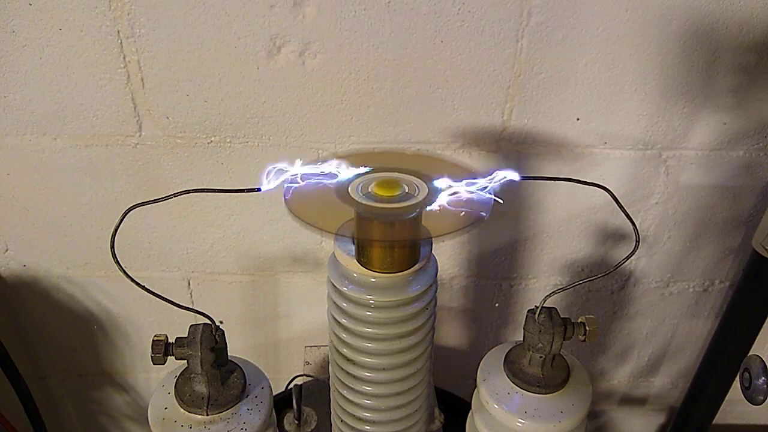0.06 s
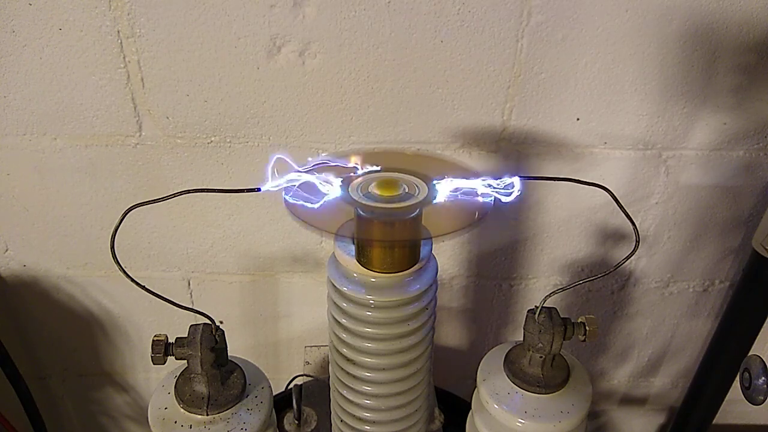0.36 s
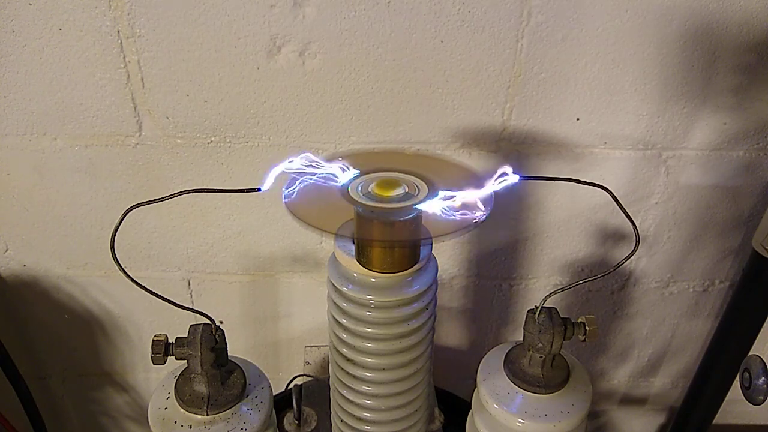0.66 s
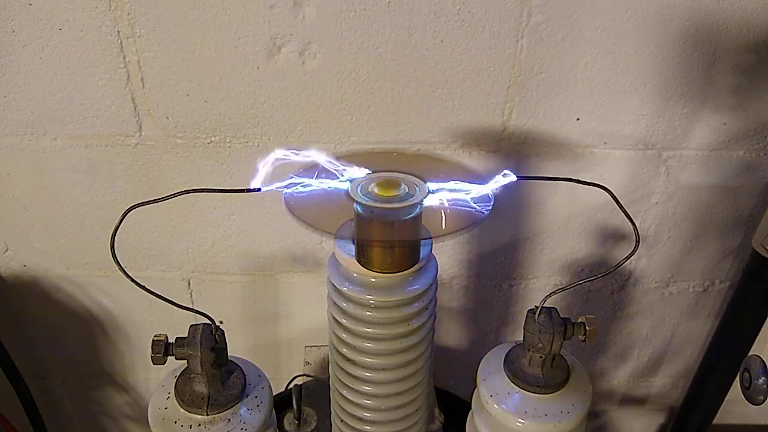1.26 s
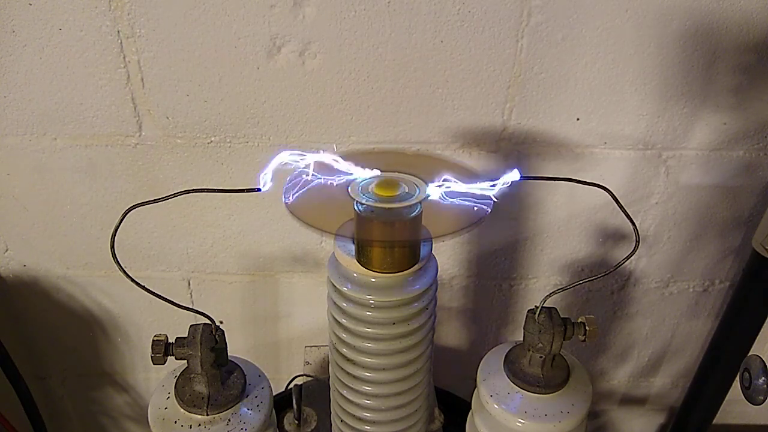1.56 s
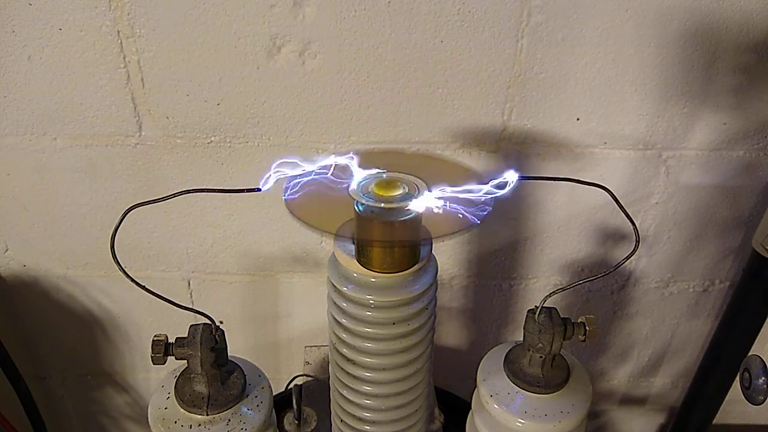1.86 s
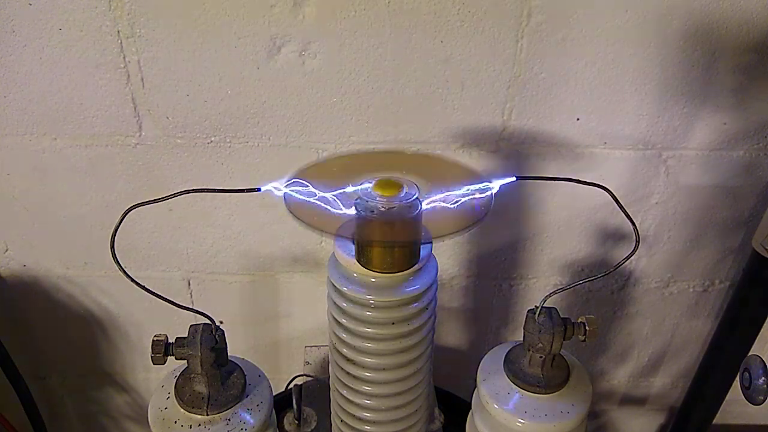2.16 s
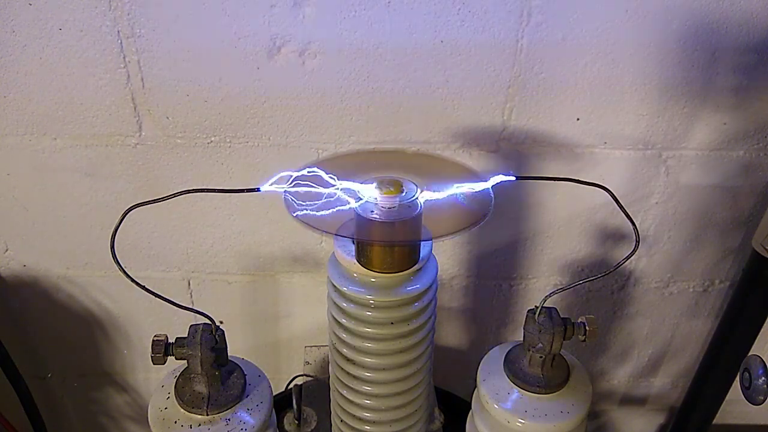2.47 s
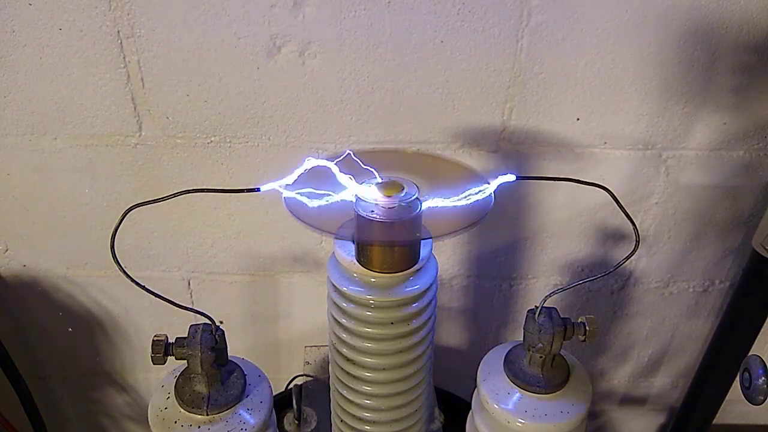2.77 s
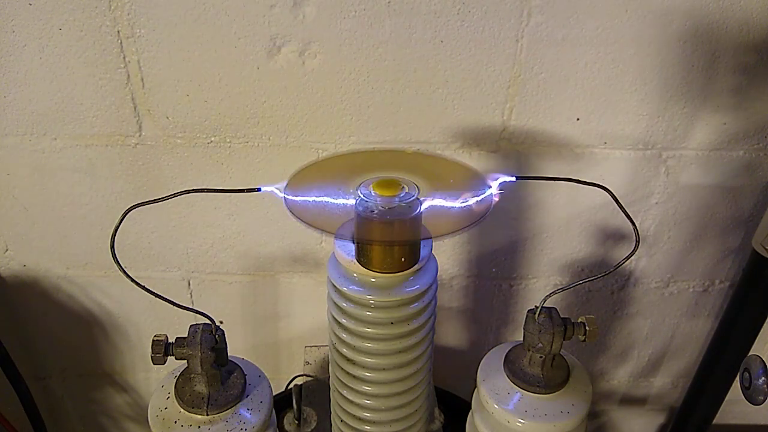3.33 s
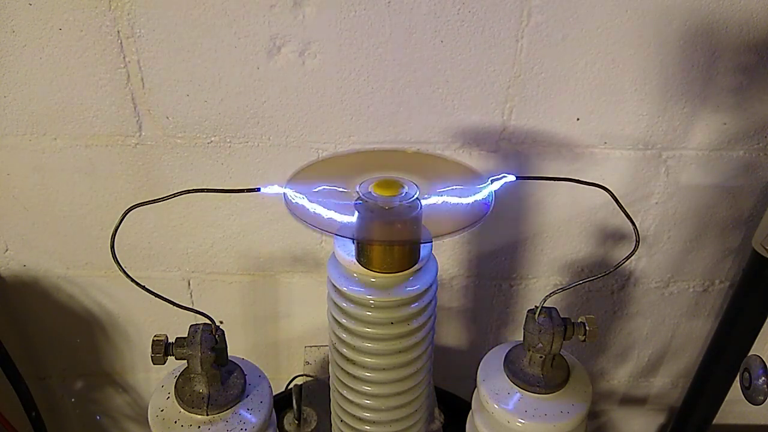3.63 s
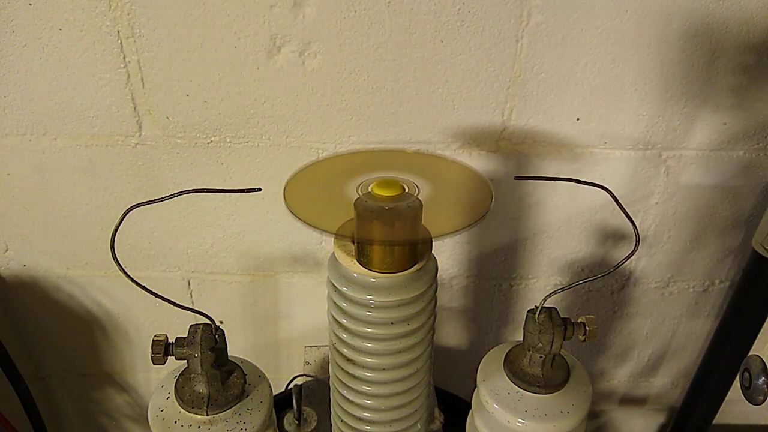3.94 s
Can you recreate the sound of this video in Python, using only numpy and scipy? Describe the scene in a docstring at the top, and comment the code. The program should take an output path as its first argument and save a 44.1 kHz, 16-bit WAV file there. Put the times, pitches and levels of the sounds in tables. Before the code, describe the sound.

High-voltage electric arcs buzz and crackle loudly from two electrodes onto a disc, with irregular sharp snaps. Past halfway the buzz turns coarser and stutters, then stops abruptly. The sound is close and wide in a small echoing room.

```python
"""High-voltage arcs, fed by mains power, jump from two electrodes onto a disc in a small masonry room.
At first both gaps spark a few times in every half cycle of the mains. Then the arc flashes right across,
in longer volleys once a cycle, changing polarity at random until the power is cut.
Each spark cracks, sizzles and thumps the air. The room echoes, and the stereo sound is widened."""
import sys
import numpy as np
from scipy import signal
from scipy.fft import rfft, irfft
from scipy.io import wavfile
from scipy.ndimage import uniform_filter1d, map_coordinates

SR = 44100
rng = np.random.default_rng(int(sys.argv[2]) if len(sys.argv) > 2 else 0)


def generate_wav(sig):
    """Save sig (samples, or channels by samples) to the path in sys.argv[1] as 16-bit PCM at SR."""
    pcm = np.round(np.clip(np.atleast_2d(sig).T, -1, 1) * 32767).astype(np.int16)
    wavfile.write(sys.argv[1], SR, pcm)


N = 176400
MAINS_HZ, FIRST_SPARK_S, FLASHOVER_S = 60.035, .0046, 2.166


def sparks():
    """The air breaks down in step with the mains: every half cycle at first, later once a cycle."""
    # sparks in a short and a long volley: delay_ms, level_db, chance (0 to 1)
    short_volley = [(0.298, 0, 1), (0.902, -5, .7), (2.098, -1, .9), (4.4, -1.5, .45)]
    long_volley = [(.25, 1, 1), (1.3, -0.5, .95), (2.1, -1, 0.93), (3.3, -1, .9), (4.8, -0.5, .85),
                   (7.3, -2.5, .45)]
    # the arc falters: start_s, end_s, level_db
    lulls = [(.365, 0.376, -5.5), (.527, .537, -7), (.577, 0.595, -10), (.64, 0.659, -6.5),
             (.712, 0.745, -2), (.93, 0.937, -8), (1.0, 1.047, -4.5), (1.36, 1.369, -6.5),
             (1.474, 1.499, -3.5), (1.915, 1.966, -3)]
    # the arc flashes right across: start_s, end_s, level_db
    runs = [(2.170, 2.337, 0.5), (2.328, 2.411, 1), (2.437, 2.488, 1.5), (2.511, 2.511, 1.5),
            (2.520, 2.520, 1.5), (2.545, 2.728, -1.5), (2.553, 2.586, -6), (2.736, 2.903, -0.5),
            (2.911, 2.978, -3.5), (2.936, 2.936, -1.5), (2.970, 3.069, -2.5), (3.028, 3.028, 0),
            (3.078, 3.228, 1), (3.253, 3.336, 1), (3.344, 3.428, -3), (3.453, 3.5855, -1),
            (3.494, 3.494, 2), (3.611, 3.661, -.5), (3.686, 3.752, 0)]
    half_cycle_s = .5 / MAINS_HZ
    early_s = np.arange(FIRST_SPARK_S, FLASHOVER_S, half_cycle_s)
    early_db = sum(db * ((early_s >= start) & (early_s <= end)) for start, end, db in lulls)
    nearest = lambda s: int(round((s - FIRST_SPARK_S) / half_cycle_s))
    late_s, late_db = np.array([(FIRST_SPARK_S + k * half_cycle_s, db) for start, end, db in runs
                                for k in range(nearest(start), nearest(end) + 1, 2)]).T
    return np.hstack([volleys(early_s, early_db, short_volley, thump_db=0),
                      volleys(late_s, late_db - .5, long_volley, thump_db=-3.5)])


def volleys(starts, db, pattern, thump_db):
    """A few sparks follow each breakdown. Returns three rows: time_s, crack_db, thump_db."""
    delay_ms, spark_db, chance = np.array(pattern).T
    shape = (len(starts), len(delay_ms))
    fires = rng.random(shape) < chance
    jitter_ms = (.12 + .1 * delay_ms) * rng.standard_normal(shape)  # later sparks stray more
    times = starts[:, None] + (delay_ms + jitter_ms) / 1000
    strength_db = (db[:, None] + spark_db)[fires]
    return np.array([times[fires], strength_db, strength_db + thump_db])


def gap(times, crack_db, thump_db, side):
    """One gap's crooked sparks, each a little different. Returns crack plus sizzle, and thump."""
    # how the strength drifts: time_s, thump_db, crack_db
    drift = [(0.0, -34.5, -25), (0.1, -34, -24.5), (0.2, -31, -23.5), (0.55, -34.5, -24),
             (0.72, -33.5, -23.5), (0.79, -31.5, -22.5), (0.9, -30, -23), (1.06, -32.5, -23),
             (1.26, -29.5, -24.5), (1.31, -36.5, -23.5), (1.54, -33.5, -24.5), (1.82, -33.5, -24.5),
             (2.12, -36.5, -25), (2.19, -39, -24), (2.31, -31, -22.5), (2.38, -37, -22.5),
             (2.65, -34, -23.5), (3.01, -31, -21.5), (3.12, -41, -24.5), (3.33, -31, -22),
             (3.53, -33.5, -23), (3.75, -32, -26)]
    # lone hard breakdowns, taking the two gaps by turns: time_s, crack_db, thump_db
    snaps = [(0.1054, -10.5, -13), (.189, -23, -21), (0.1982, -10.5, -25), (0.305, -13, -36),
             (0.3133, -15, -12), (0.3546, -19, -16.5), (0.4223, -15, -28), (0.4552, -20, -15.5),
             (0.481, -13.5, -40), (0.5059, -21, -20), (.55, -13.5, -15), (0.5711, -14.5, -39),
             (0.5991, -18.5, -13), (.606, -29, -9), (0.6298, -13, -14), (0.6806, -16, -18.5),
             (0.7656, -18, -21), (.796, -11, -15), (0.8225, -15.5, -21.5), (0.8642, -28, -27),
             (0.9053, -13, -29), (0.972, -28, -13), (1.097, -18, -33), (1.147, -20, -19),
             (1.1715, -13, -12.5), (1.228, -26, -17), (1.246, -19, -12), (1.496, -22, -9.5),
             (1.504, -21, -14), (1.55, -14.5, -28), (1.6656, -24, -17), (1.6916, -13.5, -33),
             (1.8371, -14.5, -17), (1.8469, -20, -11), (1.8705, -16, -15.5), (1.9053, -20.5, -15),
             (1.9624, -15, -22), (1.9891, -22, -28), (2.095, -11, -9), (2.122, -16, -22),
             (2.1388, -11, -44), (2.238, -17, -23), (2.3207, -11, -20), (2.3966, -14, -31),
             (2.5209, -6.5, -18), (2.545, -7, -26), (2.696, -18, -29), (2.7754, -13, -27.5),
             (2.871, -16, -14), (2.9631, -15, -23.5), (3.1825, -16, -19.5), (3.2773, -15, -29),
             (3.5549, -16, -25), (3.72, -19.5, -21), (3.7533, -13, -23.5), (3.7602, -23, -31.5)]
    drift_s, bass_db, treble_db = np.array(drift).T
    snap_s, snap_db, pop_db = np.array(snaps[side::2]).T
    path, sharpness, heat, lag, push = rng.standard_normal((len(times), 5)).T
    times = times + .00016 * path
    crack_db = crack_db + np.interp(times, drift_s, treble_db) + 2 * sharpness
    thump_db = thump_db + np.interp(times, drift_s, bass_db) + 4.5 * heat
    power = clicks(times, undb(crack_db) ** 2) + clicks(snap_s, undb(snap_db) ** 2)
    direction = np.sign(push + .45)  # more thumps push than pull
    pushes = clicks(times + .00057 * lag, direction * undb(thump_db)) + clicks(snap_s, undb(pop_db))
    return crack(power) + sizzle(power), thump(pushes)


def crack(power):
    """Each spark gives a very short, ragged crack."""
    # tone of a crack: pitch_hz, level_db
    tone = [(60, -21.5), (250, 0.5), (600, 2), (1200, -1.5), (2100, -4.5), (2900, -3.5), (3800, -4.5),
            (5200, -11.5), (6500, -15), (8000, -19.5), (11000, -14.5), (15000, -16.5)]
    return level(colour(bursts(power, fade_ms=.35), tone), -23.5)


def thump(pushes):
    """Air heated by a spark gives a low thump."""
    # tone of a thump before and after the arc flashes across: pitch_hz, level_db
    short_tone = [(25, -38.5), (45, -12), (65, -2.5), (95, -4), (150, -1.5), (250, -5.5), (500, -14.5),
                  (1000, -24.5), (2500, -47), (8000, -69)]
    long_tone = [(25, -20), (45, -13), (65, -8), (95, -3.5), (150, -1), (250, -4), (500, -15.5),
                 (1000, -26.5), (2500, -32), (8000, -57)]
    across = np.arange(N) / SR > FLASHOVER_S
    return level(colour(pushes * ~across, short_tone) + colour(pushes * across, long_tone), -21)


def sizzle(power):
    """Each spark sizzles briefly over the disc."""
    # tone of the sizzle: pitch_hz, level_db
    tone = [(1000, -7), (3000, 4.5), (6000, -9), (8000, -5), (11000, 1.5), (15000, 6.5)]
    return level(colour(bursts(power, fade_ms=2.3), tone), -40)


def in_room(cracks, thumps):
    """The direct sound, quick echoes off the near wall, longer room echoes and background noise."""
    # tone of the cracks' echoes, and extra shaping for the late ones: pitch_hz, level_db
    wall_tone = [(100, -10.5), (500, -18), (1200, -13.5), (2200, 3), (3100, -2.5), (5000, 1.5), (8000, 5),
                 (11000, 5), (15000, -0.5)]
    late_tone = [(150, 1), (400, -4.5), (600, 9), (800, -8), (1500, -1), (3000, 3.5), (7000, -3),
                 (15000, -7.5)]
    bright = colour(cracks, wall_tone)
    early = undb(-4.5) * wandering_echoes(bright, fade_s=.13, paths=5)
    late = echoes(undb(-15.5) * colour(bright, late_tone) + undb(-29.5) * thumps, fade_s=.74)
    return cracks + thumps + early + late + ring(cracks) + background()


def wandering_echoes(x, fade_s, paths):
    """Each volley takes one of a few paths over the disc, and each path has its own echoes."""
    volley = (np.maximum(np.arange(N) / SR - FIRST_SPARK_S, 0) * 2 * MAINS_HZ).astype(int)
    path = rng.integers(paths, size=volley[-1] + 1)[volley]
    return sum(echoes(x * (path == k), fade_s) for k in range(paths))


def echoes(x, fade_s, wall_delay_s=.0011):
    """Dense echoes off the walls, dying away by 60 dB in fade_s."""
    t = np.arange(SR) / SR
    onset = np.clip(t / wall_delay_s - .5, 0, 1)
    response = rng.standard_normal(SR) * undb(-60 * t / fade_s) * onset
    return signal.fftconvolve(x, response / np.sqrt(np.sum(response ** 2)))[:N]


def ring(cracks):
    """The cracks keep a faint hollow ring going, which lingers when the arc stops."""
    # low ringing notes: pitch_hz, level_db, fade_s (time to fall 60 dB)
    notes = [(289, 2, 0.57), (526.6, 1.5, 0.55), (646, -7, 0.91), (744, -7, 0.94)]
    t = np.arange(SR) / SR
    response = sum(undb(db - 60 * t / fade_s) * np.sin(2 * np.pi * hz * t) for hz, db, fade_s in notes)
    return level(signal.fftconvolve(cracks, response)[:N], -48.5)


def background():
    """A faint, steady rush of noise."""
    # tone of the noise: pitch_hz, level_db
    tone = [(30, -18), (130, -9), (600, -15), (3000, -7), (15000, -28)]
    return level(colour(rng.standard_normal(N), tone), -52)


def clicks(times, sizes):
    """One sharp pulse at each time."""
    return np.bincount(np.clip(times * SR, 0, N - 1).astype(int), sizes, N)


def bursts(power, fade_ms):
    """A dying burst of noise at each pulse."""
    fading_power = signal.lfilter([1], [1, -np.exp(-1000 / (fade_ms * SR))], power + 1e-18)
    return np.sqrt(fading_power) * rng.standard_normal(N)


def colour(x, tone, size=4096):
    """Filters a sound to follow a curve of (pitch_hz, level_db) points."""
    hz, db = np.array(tone).T
    grid_hz = np.maximum(np.fft.rfftfreq(size, 1 / SR), 1)
    gain = undb(np.interp(np.log(grid_hz), np.log(hz), db))
    cepstrum = irfft(np.log(gain))
    cepstrum[1:size // 2] *= 2  # folded so that the filter rings only after a pulse
    cepstrum[size // 2 + 1:] = 0
    return signal.fftconvolve(x, irfft(np.exp(rfft(cepstrum))))[:N]


def undb(db):
    """Turns decibels into a multiplier."""
    return 10 ** (np.asarray(db) / 20)


def level(x, db):
    """Scales a sound to an average (RMS) level."""
    return x * undb(db) / np.sqrt(np.mean(x ** 2))


def limit(x, threshold_db=-20.5, ratio=1.6, response_ms=22):
    """Turns both sides down quickly when the cracks pile up."""
    pole = np.exp(-1000 / (response_ms * SR))
    cracks = signal.sosfilt(signal.butter(2, 300, "high", fs=SR, output="sos"), x)
    power = signal.lfilter([1 - pole], [1, -pole], np.mean(cracks ** 2, axis=0))
    heard_db = 10 * np.log10(power + 1e-12)
    return x * undb(np.minimum(threshold_db - heard_db, 0) * (1 - 1 / ratio))


def widen(x, delay_ms=.426):
    """Widens the stereo by subtracting a dulled, delayed copy of each side from the other."""
    dulled = undb(-1.8) * signal.sosfilt(signal.butter(4, 12500, fs=SR, output="sos"), x)
    delayed = np.arange(N) - delay_ms * SR / 1000
    return x - np.array([map_coordinates(side, [delayed], order=3) for side in dulled[::-1]])


def gate(x, threshold_db=-45, depth_db=22, slope=5.5):
    """Turns quiet moments down further."""
    power = uniform_filter1d(np.mean(x ** 2, axis=0), size=900)
    heard_db = 10 * np.log10(np.abs(power) + 1e-12)
    return x * undb(np.clip(slope * (heard_db - threshold_db), -depth_db, 0))


def scene():
    """The two gaps spark together, one on the left and one on the right."""
    train = sparks()
    return np.array([in_room(*gap(*train, side)) for side in (0, 1)])


def record(dry, ceiling=.5, top_hz=15700):
    """Two microphones, then a limiter, soft overload, widening, a gate and a cut of the highest treble."""
    # tone of the right microphone: pitch_hz, level_db
    right_mic = [(100, 4.5), (1500, 3.5), (3500, -1), (7000, 1), (10300, -3), (12500, 4), (15000, 8.5)]
    mics = limit(np.array([dry[0], colour(dry[1], right_mic)]))
    rounded = ceiling * np.tanh(mics / ceiling)
    return signal.sosfilt(signal.ellip(10, .2, 80, top_hz, fs=SR, output="sos"), gate(widen(rounded)))


dry = scene()
out = record(dry)
generate_wav(out)
```